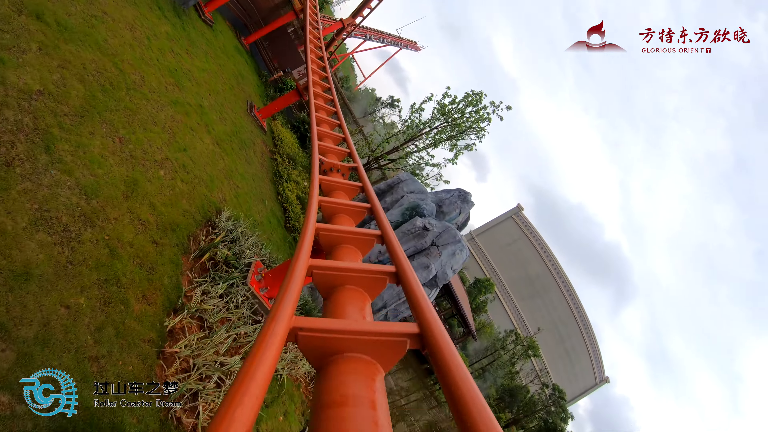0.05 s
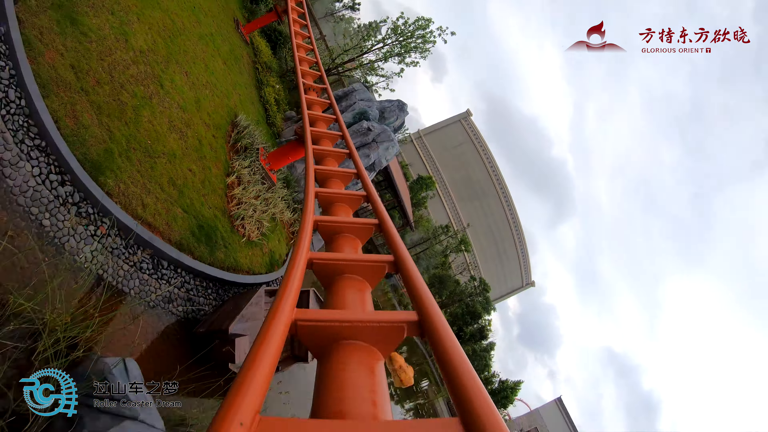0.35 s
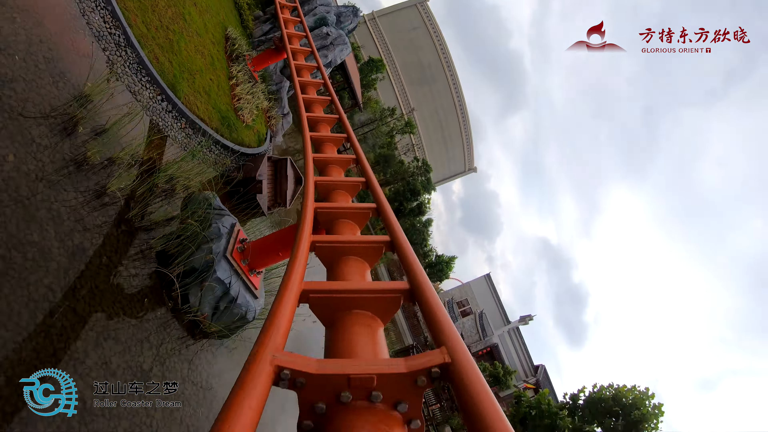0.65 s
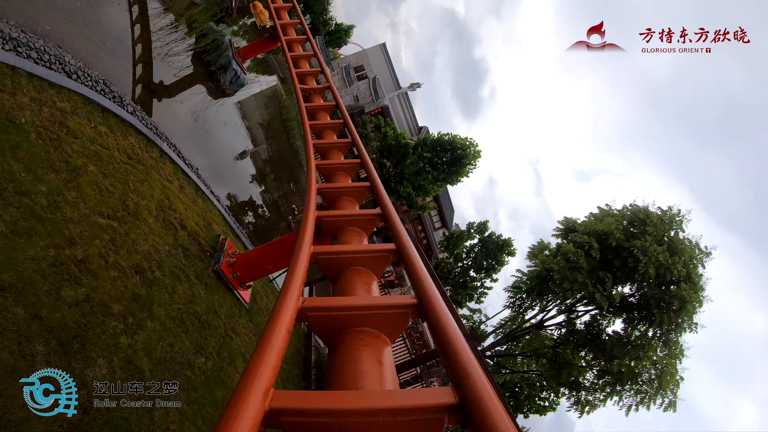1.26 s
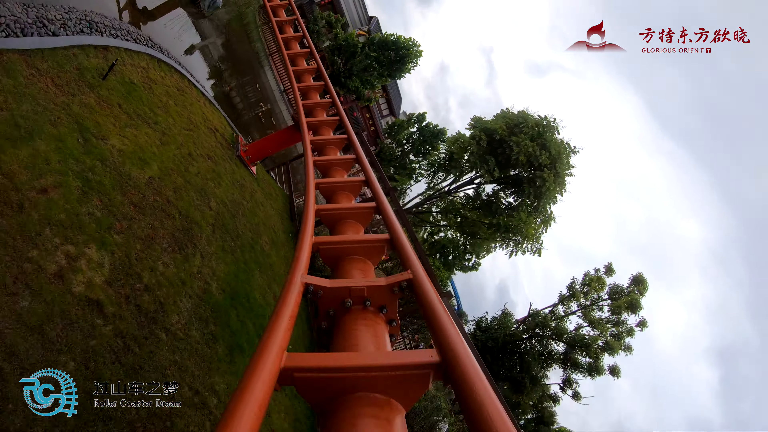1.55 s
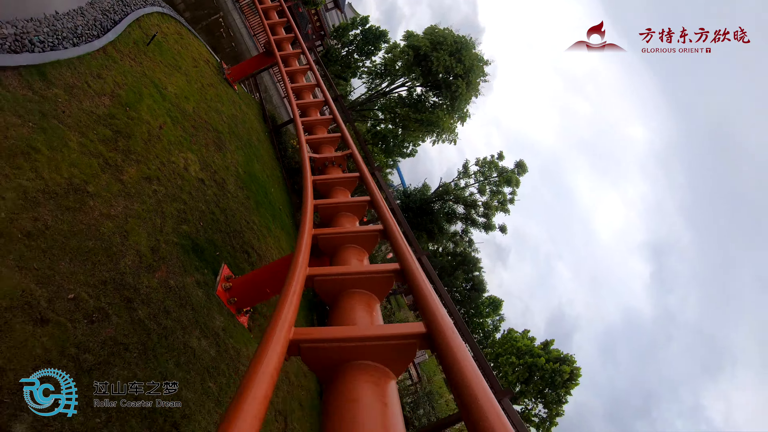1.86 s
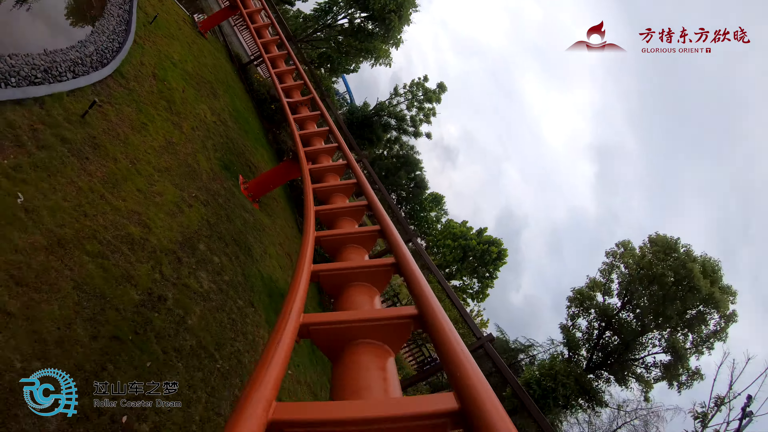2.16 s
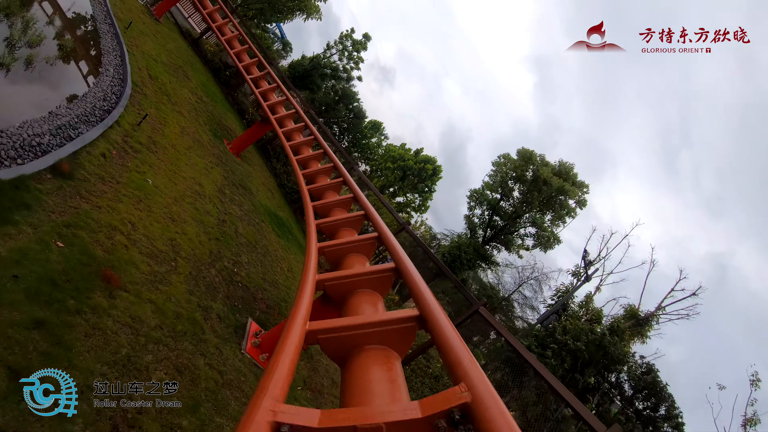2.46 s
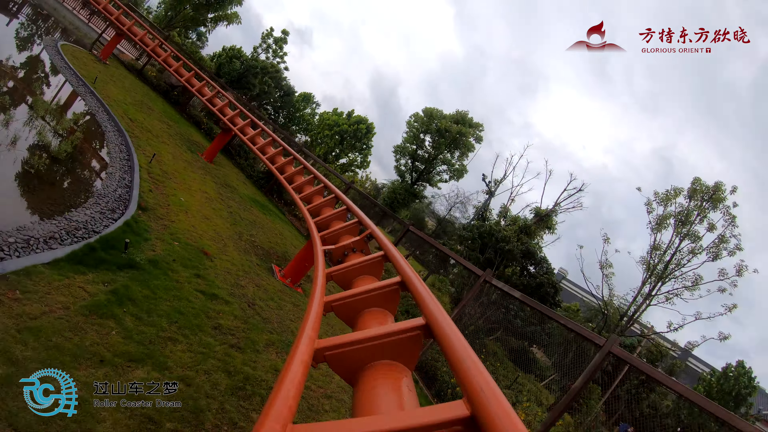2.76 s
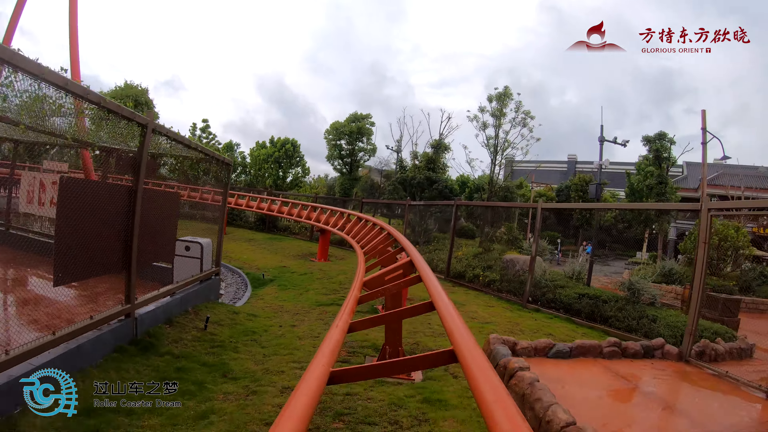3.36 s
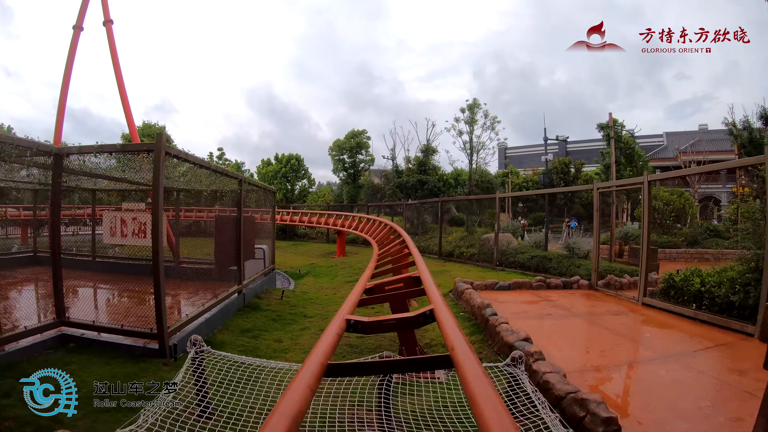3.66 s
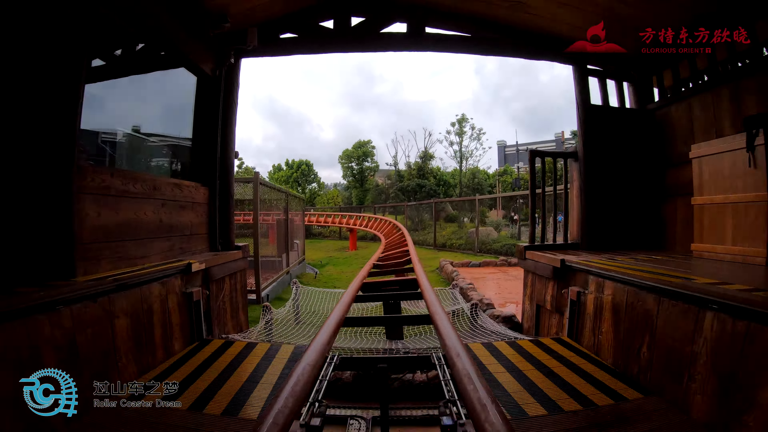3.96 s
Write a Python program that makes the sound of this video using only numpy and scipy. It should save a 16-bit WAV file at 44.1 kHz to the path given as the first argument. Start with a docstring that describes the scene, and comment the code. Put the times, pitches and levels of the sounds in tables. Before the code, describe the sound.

Heard from the front of the car outdoors, a roller coaster rolls with a low rumble, irregular knocks, rattles and a wavering track hum. Wind rushes over the microphone throughout; the ride softens briefly before a final cluster of knocks.

```python
"""Roller coaster, low banked curve.

A camera rides on the front of a steel car. The wheels rumble through the car's resonances, knock on
uneven rail and shake loose fittings into rattles and ticks; the track hums, a wheel whines faintly.
Wind buffets the microphone over a thin hiss that swells as the car enters a shelter.
A limiter holds the peaks."""
import sys
import numpy as np
from scipy.fft import rfft, irfft, next_fast_len
from scipy.io import wavfile
from scipy.ndimage import uniform_filter1d, minimum_filter1d, map_coordinates

SR = 44100
rng = np.random.default_rng(int(sys.argv[2]) if len(sys.argv) > 2 else 0)


def transcribe(u):
    """Save the signal u as a 16-bit wav file named by the first command-line argument.

    u: samples, shape (n,) or (channels, n), limited to [-1, 1]; the rate is SR.
    q: integer samples, one column per channel.
    """
    v = np.clip(np.atleast_2d(u).T, -1, 1)
    q = np.round(v * 32767).astype(np.int16)
    wavfile.write(sys.argv[1], SR, q)


N = 176400

# ride envelopes (time [s], low rumble [dB], shell drone [dB], wind rush [dB])
RIDE_LEVELS = [(0, -21.5, -17.5, -27), (.15, -18.5, -18.5, -30.5), (.35, -20, -13, -28.5),
               (.55, -15.5, -16.5, -29), (.8, -22, -17, -30.5), (1.0, -21, -15.5, -33),
               (1.17, -20, -17.5, -31), (1.45, -17, -14.5, -27.5), (1.78, -18, -15, -27),
               (2.3, -19, -14.5, -29), (2.48, -19.5, -15, -29.5), (2.64, -22.5, -22.5, -36),
               (2.87, -19, -21, -36.5), (3.0, -16, -20, -32), (3.22, -16, -16.5, -30.5),
               (3.42, -19, -13.5, -28.5), (3.54, -19, -11, -27), (3.63, -22.5, -19.5, -35.5),
               (3.72, -20.5, -17, -33.5), (3.98, -21, -27, -36.5)]
# hiss envelopes (time [s], rolling [dB], air [dB])
HISS_LEVELS = [(0.0, -55.5, -65.5), (0.5, -57, -62), (0.66, -58.5, -65.5), (0.91, -57.5, -64.5),
               (1.53, -55.5, -65.5), (2.33, -58.5, -68), (2.55, -64, -69), (2.78, -67, -66.5),
               (3.0, -64.5, -65), (3.37, -64.5, -65.5), (3.52, -58.5, -63.5), (3.96, -57.5, -58)]
# chassis resonances (frequency [Hz], width [Hz], gain [dB])
CHASSIS_MODES = [(58, 9.2, -1.5), (74.3, 5.9, 3), (108.5, 11, -0.5), (122, 6.9, -8.5), (176.3, 13, -1.5)]
# shell resonances (frequency [Hz], width [Hz], gain [dB])
SHELL_MODES = [(221.8, 25, -2.5), (257.8, 13, -1.5), (303.5, 23, -8), (330.3, 11.7, 1), (390.3, 22.8, -6)]
# rolling hiss (frequency [Hz], density [dB])
ROLLING_SPECTRUM = [(700, -11), (1300, 1), (1850, -3.5), (2150, -4), (2600, -5.5), (3050, -6.5),
                    (3600, -12), (6000, -31), (12000, -71)]

def wheel_rumble():
    """Rail roughness drives chassis and shell through the wheels, which hiss faintly."""
    low_db, drone_db, _ = curves(RIDE_LEVELS)
    rolling_db, _ = curves(HISS_LEVELS)
    chassis = amp(low_db + 1) * resonating(CHASSIS_MODES, edge_hz=193.4, even_s=.12)
    shell = amp(drone_db - .5) * resonating(SHELL_MODES, edge_hz=462, even_s=.076)
    rolling = amp(rolling_db + 1.8 * wobble(60)) * noise(ROLLING_SPECTRUM)
    return chassis + shell + rolling


# wheel knocks (time [s], ring [dB], crack [dB])
WHEEL_KNOCKS = [(.248, -20.5, -51.5), (.387, -15.5, -34), (.457, -36, -44.5), (.501, -20.5, -40),
                (.523, -17.5, -46.5), (.625, -12.5, -43.5), (.637, -26, -44), (.654, -13, -42.5),
                (.729, -21.5, -51.5), (.795, -19.5, -48), (.907, -24.5, -53), (1.065, -15.5, -39.5),
                (1.075, -21, -46), (1.3, -26.5, -48.5), (1.472, -22.5, -39.5), (1.49, -16, -37.5),
                (1.509, -13.5, -48), (1.526, -21.5, -38.5), (1.68, -15.5, -49.5), (1.697, -14, -51.5),
                (1.768, -21, -44), (1.823, -23.5, -47.5), (1.912, -21, -46), (1.976, -26.5, -43),
                (2.041, -19.5, -52.5), (2.102, -11, -41), (2.117, -23.5, -44.5), (2.16, -20.5, -40),
                (2.179, -21, -42.5), (2.226, -17, -52.5), (2.26, -10.5, -34), (2.325, -21.5, -53.5),
                (2.362, -25.5, -41.5), (2.443, -25, -39), (2.469, -25.5, -41.5), (2.482, -12.5, -43),
                (2.516, -25, -50), (2.756, -31, -50), (2.819, -24, -56), (2.953, -31.5, -49.5),
                (2.991, -28, -48), (3.133, -25, -55.5), (3.175, -24, -52), (3.194, -15.5, -48),
                (3.317, -18, -47.5), (3.401, -32, -48.5), (3.415, -21.5, -47), (3.444, -22.5, -48.5),
                (3.507, -14.5, -45), (3.514, -21.5, -41.5), (3.531, -11.5, -38.5), (3.558, -25.5, -48.5),
                (3.662, -23.5, -58)]
# modes of the struck car (frequency [Hz], gain [dB], T60 [s])
CAR_MODES = [(252, -1.5, 0.1), (308.3, 1.5, 0.44), (422, -4, 0.053), (482, -5.5, 0.21), (587, 4.5, 0.081),
             (687, 4.5, 0.035), (783, -3, 0.056), (864, -12.5, 0.083), (978, -6, .055), (1111, -10, .045)]
# crack and clatter (frequency [Hz], density [dB])
CRACK_SPECTRUM = [(300, -10), (900, 2), (1400, 3), (1900, -3.5), (3000, -12), (3600, -17), (4600, -15),
                  (5800, -29), (7500, -29), (10000, -42.5), (12000, -56)]

def knocks():
    """Each wheel knock or small random rattle rings the car and sheds a crack, then gritty clatter."""
    _, _, rush_db = curves(RIDE_LEVELS)
    blows = list(WHEEL_KNOCKS)
    for s, size in random_events(per_s=18):  # rattles
        rattle_db = rush_db[int(s * SR)] + 1.7 * size
        blows.append((s, rattle_db - 3.5, rattle_db - 22.5))
    ring, crack, clatter = np.zeros((3, N))
    snap, tail = burst(rise_s=.0017, t60_s=.021), burst(rise_s=.0017, t60_s=.11)
    for s, ring_db, crack_db in blows:
        crack_gain = amp(crack_db + 1.2)
        add(ring, s, car_ring(ring_db))
        add(crack, s, crack_gain * snap)
        add(clatter, s, crack_gain * amp(-9) * tail)
    grit = unit(amp(3.5 * np.tanh(wobble(280))))
    return ring + np.hypot(crack, clatter * grit) * evened(noise(CRACK_SPECTRUM), even_s=.0055)


def car_ring(ring_db, attack_s=.001, scatter_db=2, usual_db=-17):
    """One blow excites the car's damped modes; harder is brighter, and no two are alike."""
    t = np.arange(SR // 6) / SR
    hz, mode_db, t60_s = np.transpose(CAR_MODES)[:, :, None]
    size, detune, phase = rng.standard_normal((3, len(hz), 1))
    envelope = (1 - np.exp(-(t / attack_s) ** 2)) * amp(mode_db - 60 * t / t60_s)
    tilt_db = np.clip(.21 * (ring_db - usual_db) * np.log2(hz / hz.mean()), -4, 4)
    partials = np.sin(2 * np.pi * (hz * (1 + .018 * detune) * t + phase))
    ring = (amp(scatter_db * size + tilt_db) * envelope * partials).sum(0)
    return amp(ring_db + 4.5) * ring / np.abs(ring).max()


# buffeting (frequency [Hz], density [dB])
BUFFET_SPECTRUM = [(10, -29), (25, -15), (38, -10), (52, -5.5), (120, -4.5), (300, -6), (420, -10.5),
                   (600, -23.5), (1200, -84.5), (3000, -120)]
# wind rush (frequency [Hz], density [dB])
RUSH_SPECTRUM = [(250, -30.5), (420, 0.5), (478, -10.5), (503, 0), (530, -1), (580, 0.5), (630, -5),
                 (675, 1), (715, -7.5), (760, -8.5), (890, -13.5), (970, -13.5), (1140, -21.5),
                 (1230, -30.5), (1700, -37), (3500, -76), (8000, -110)]
# air hiss (frequency [Hz], density [dB])
AIR_SPECTRUM = [(1500, -9.5), (3400, -5), (4300, 1.5), (5000, 0.5), (5800, -7), (6900, -0.5), (7900, -6),
                (8800, -12.5), (10400, -12), (11400, -25), (13300, -29.5), (14300, -57.5)]

def wind():
    """Air over the microphone: low buffeting, a fluttering rush, a smooth hiss."""
    low_db, _, rush_db = curves(RIDE_LEVELS)
    _, air_db = curves(HISS_LEVELS)
    buffet = amp(low_db - 7.5) * unit(amp(3.5 * wobble(25)) * noise(BUFFET_SPECTRUM))
    rush = amp(rush_db) * unit(amp(2.5 * wobble(70)) * noise(RUSH_SPECTRUM))
    hiss = amp(air_db - .7) * noise(AIR_SPECTRUM)
    return buffet + rush + hiss


# track hum envelope (time [s], level [dB])
HUM_LEVELS = [(0, -25.5), (.62, -26.5), (.68, -19.5), (1.1, -19.5), (1.17, -33), (1.45, -19.5),
              (1.54, -40.5), (1.71, -16), (1.8, -37.5), (2.0, -19.5), (2.55, -21), (2.75, -25),
              (3.4, -28.5), (3.52, -15), (3.97, -40)]

def track_hum(pitch_hz=144.3, waver_hz=3, swing_db=2):
    """One wavering resonance of the steel track comes and goes under the car."""
    phase = 2 * np.pi * np.cumsum(pitch_hz + waver_hz * wobble(18)) / SR
    rms = amp(curves(HUM_LEVELS)[0] + swing_db * wobble(22))
    return np.sqrt(2) * rms * np.sin(phase)


# clear ticks (time [s], level [dB])
CLEAR_TICKS = [(.1178, -51), (.174, -54.5), (.2513, -54), (0.3893, -57.5), (0.4563, -53.5), (0.473, -54),
               (0.501, -52), (.5234, -54), (0.5521, -51), (.577, -48), (.615, -57), (.638, -51.5),
               (0.8072, -52.5), (1.045, -55), (1.066, -56), (1.2288, -54), (1.2856, -55.5), (1.3926, -54),
               (1.471, -55.5), (1.4824, -47.5), (1.7403, -56), (1.8244, -55), (1.855, -52.5), (1.8781, -55),
               (1.88, -51.5), (1.9117, -54.5), (1.9673, -53), (2.3755, -50.5), (2.7567, -58), (2.9528, -56),
               (2.9915, -56), (3.362, -55.5), (3.4386, -52), (3.4452, -54), (3.5132, -45.5), (3.518, -52),
               (3.531, -57)]
# tick noise (frequency [Hz], density [dB])
TICK_SPECTRUM = [(800, -5), (2000, 5), (4700, 2), (5800, -4), (7600, -0.5), (8800, -5), (10300, -9.5),
                 (11300, -15.5), (13500, -19.5), (15000, -34.5)]

def fitting_ticks(cluster_db=3.5, spread_db=2.5):
    """Loose fittings tick: clear ones among clusters of faint ones that grow with the rush."""
    _, _, rush_db = curves(RIDE_LEVELS)
    clear, faint = burst(rise_s=.00081, t60_s=.013), burst(rise_s=.0004, t60_s=.005)
    faint_db = -60 + .5 * (rush_db - rush_db.mean()) + cluster_db * wobble(11)
    envelope = np.zeros(N)
    for s, tick_db in CLEAR_TICKS:
        add(envelope, s, amp(tick_db + 1.5) * clear)
    for s, size in random_events(per_s=80):
        add(envelope, s, amp(faint_db[int(s * SR)] + spread_db * size) * faint)
    return envelope * evened(noise(TICK_SPECTRUM), even_s=.002)


# whine envelope (time [s], level [dB])
WHINE_LEVELS = [(0, -61.5), (.5, -61), (.56, -76), (.95, -63), (1.2, -64.5), (1.45, -59.5), (1.6, -74),
                (1.78, -64), (2.1, -68), (2.6, -85)]
# whining wheel's resonances (frequency [Hz], width [Hz], gain [dB])
WHEEL_MODES = [(2160, 55, -1.5), (2840, 60, -11)]
# squeak resonances (frequency [Hz], width [Hz], gain [dB])
SQUEAK_PARTIALS = [(1400, 94, 0), (3300, 110, -1)]

def wheel_squeal(squeak_at_s=.499, squeak_s=.022, squeak_db=-40.5):
    """A thin whine while the wheels press sideways, and one short squeak of steel."""
    whine = amp(curves(WHINE_LEVELS)[0]) * resonating(WHEEL_MODES, edge_hz=2600, even_s=.078)
    stroke = np.sin(np.pi * np.clip((np.arange(N) / SR - squeak_at_s) / squeak_s, 0, 1))
    squeak = amp(squeak_db) * stroke * resonating(SQUEAK_PARTIALS, edge_hz=2900, even_s=.0065)
    return whine + squeak


def amp(db):
    """Decibels to gain."""
    return 10 ** (np.asarray(db) / 20)


def unit(x):
    """Scale to rms 1."""
    return x / np.sqrt(np.mean(x ** 2) + 1e-20)


def evened(x, even_s):
    """Hold rms near 1 over windows of even_s."""
    power = np.abs(uniform_filter1d(x ** 2, int(even_s * SR) + 1))
    return unit(x / np.sqrt(power + 1e-12))


def curves(rows):
    """Per-sample curve for each column after the time."""
    times_s, *columns = np.transpose(rows)
    return [np.interp(np.arange(N) / SR, times_s, column) for column in columns]


def wobble(knots_per_s):
    """Smooth random curve, deviation about 1."""
    return map_coordinates(rng.standard_normal(2048), [np.arange(N) * knots_per_s / SR], mode="mirror")


def filtered(x, response):
    """Zero-phase filter with gain response(hz)."""
    n_fft = next_fast_len(N + SR // 2)
    return irfft(rfft(x, n_fft) * response(np.fft.rfftfreq(n_fft, 1 / SR)), n_fft)[:N]


def noise(spectrum):
    """Shaped noise, rms 1."""
    points_hz, points_db = np.transpose(spectrum)
    response = lambda hz: amp(np.interp(np.log(hz + 1), np.log(points_hz), points_db))
    return unit(filtered(rng.standard_normal(N), response))


def resonating(modes, edge_hz, even_s):
    """Noise-driven resonances, low-passed at edge_hz, steady rms 1."""
    def response(hz):
        power = sum(amp(db) ** 2 / (1 + ((hz ** 2 - mode_hz ** 2) / (hz * width_hz + 1e-6)) ** 2)
                    for mode_hz, width_hz, db in modes)
        return np.sqrt(power / (1 + (hz / edge_hz) ** 16))
    return evened(filtered(rng.standard_normal(N), response), even_s)


def burst(rise_s, t60_s):
    """Envelope of one brief contact, peak 1."""
    t = np.arange(SR // 8) / SR
    shape = (1 - np.exp(-(t / rise_s) ** 2)) * amp(-60 * t / t60_s)
    return shape / shape.max()


def random_events(per_s):
    """Poisson events as rows (time [s], size [standard deviations])."""
    gap_draws, size_draws = rng.random((400, 2)).T
    times_s = np.cumsum(-np.log(1 - gap_draws)) / per_s
    sizes = np.sqrt(12) * (size_draws - .5)
    return np.column_stack([times_s, sizes])[times_s < N / SR]


def add(track, at_s, sound):
    """Mix a sound in at a time."""
    part = track[max(0, round(at_s * SR)):][:len(sound)]
    part += sound[:len(part)]


def scene():
    """All sources at one microphone on the car."""
    rolling = wheel_rumble() + track_hum() + wheel_squeal()
    return (rolling + wind() + fitting_ticks() + knocks())[None]


def record(dry):
    """The camera's limiter turns peaks down smoothly; a band limit follows."""
    ceiling, smoothing_s, top_hz = .71, .0026, 15100
    span = int(smoothing_s * SR)
    needed_gain = np.minimum(1, ceiling / (np.abs(dry[0]) + 1e-9))
    held_gain = minimum_filter1d(needed_gain, 2 * span + 1)
    gain = uniform_filter1d(uniform_filter1d(held_gain, span), span)
    return filtered(dry[0] * gain, lambda hz: hz < top_hz)[None]


dry = scene()
out = record(dry)
transcribe(out)
```